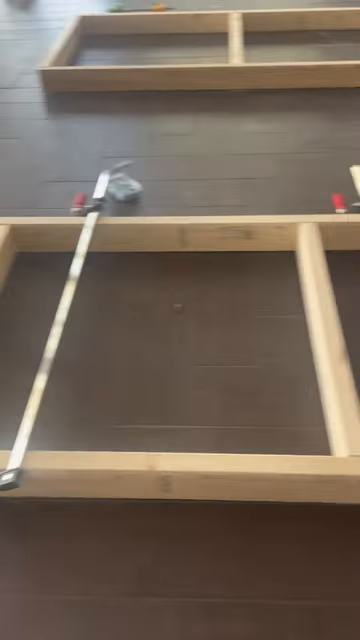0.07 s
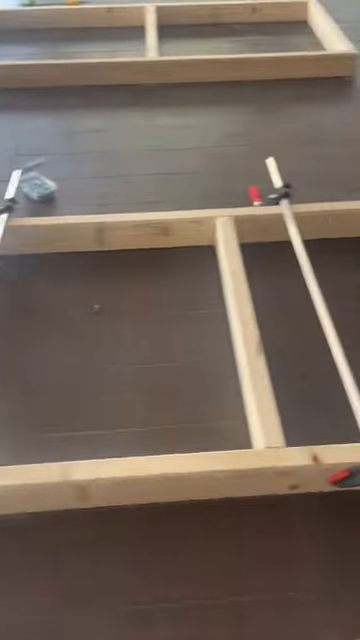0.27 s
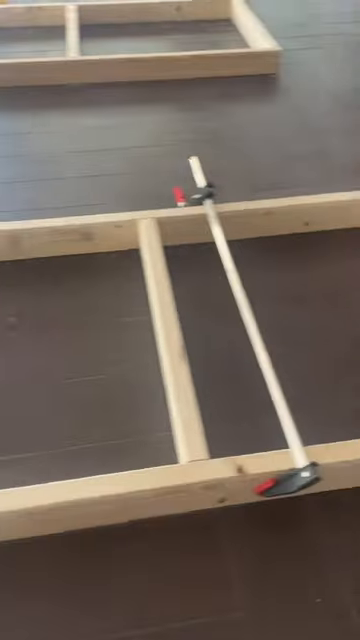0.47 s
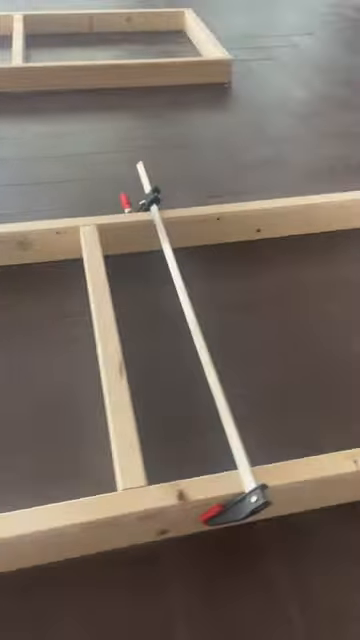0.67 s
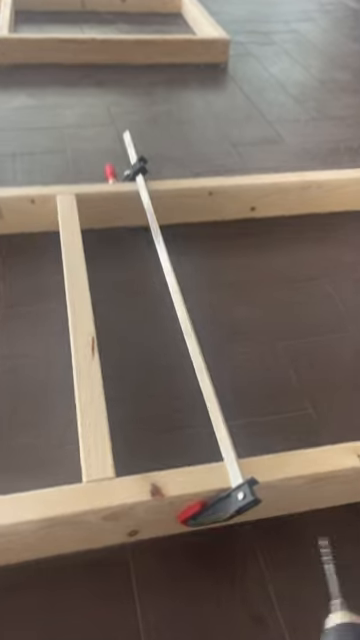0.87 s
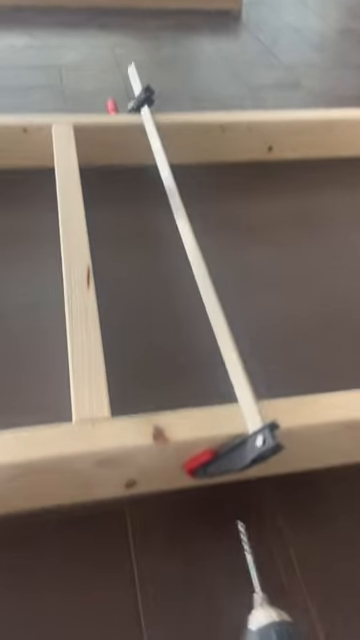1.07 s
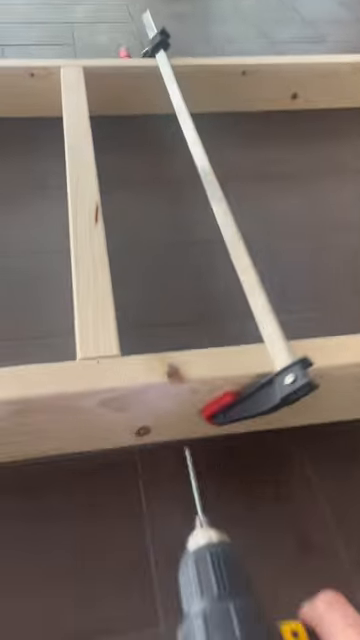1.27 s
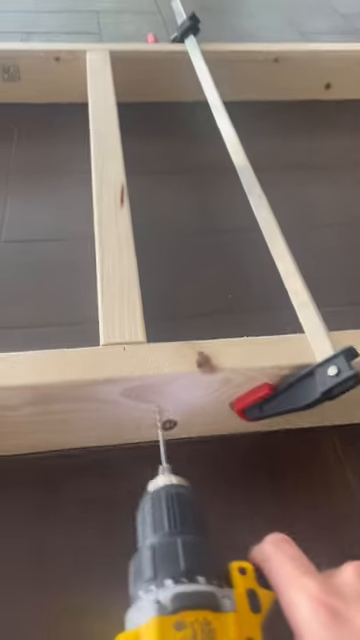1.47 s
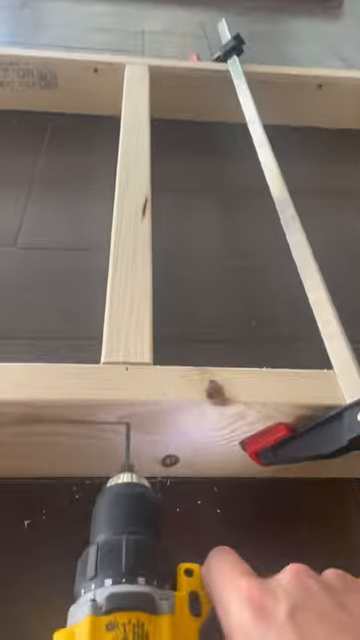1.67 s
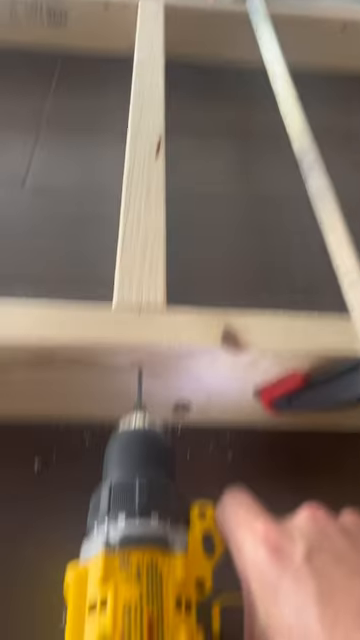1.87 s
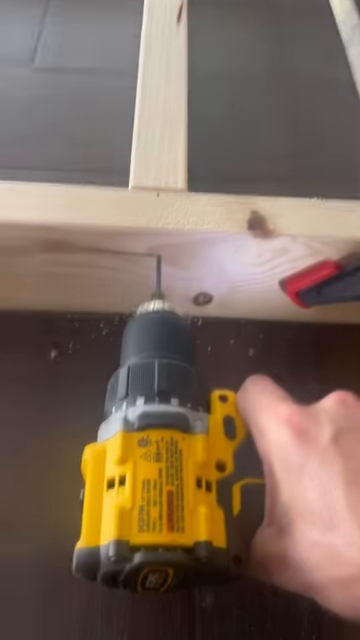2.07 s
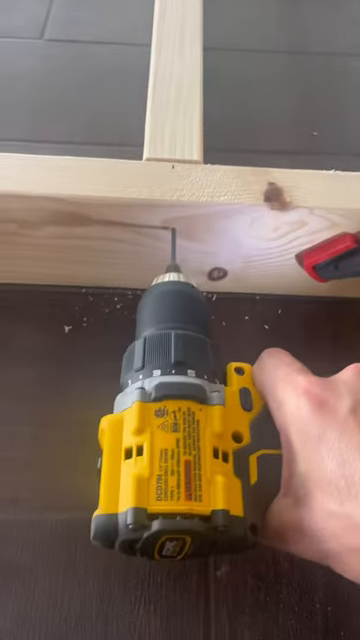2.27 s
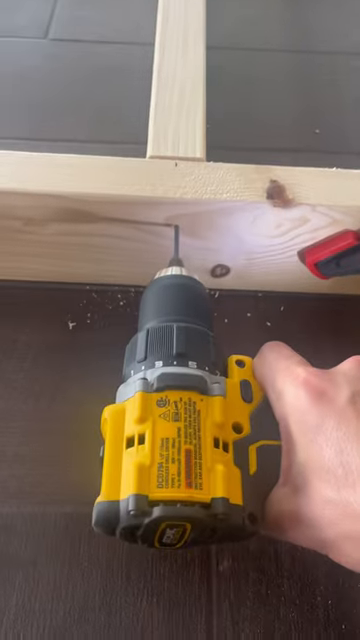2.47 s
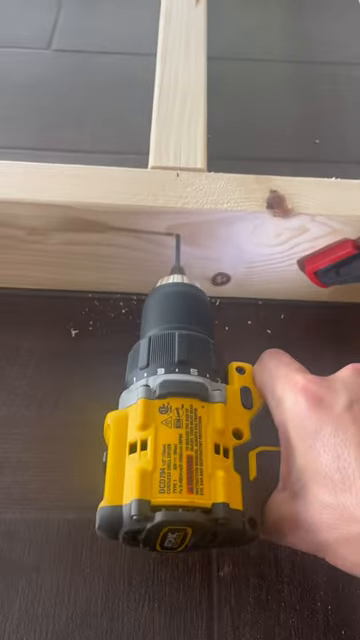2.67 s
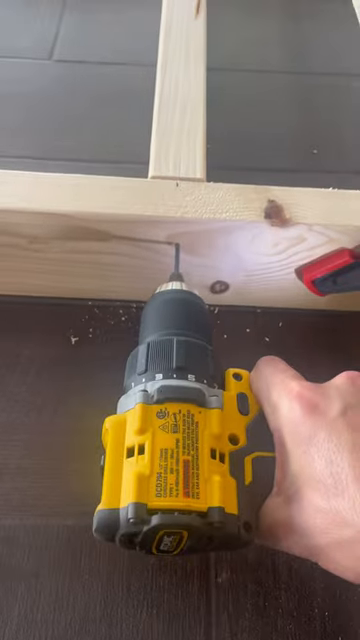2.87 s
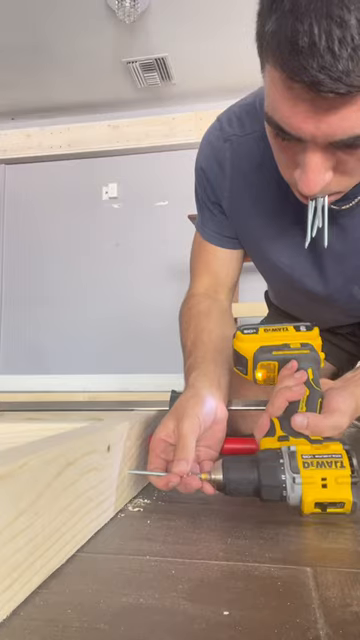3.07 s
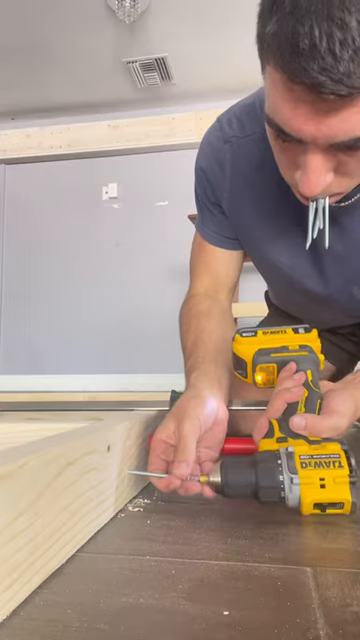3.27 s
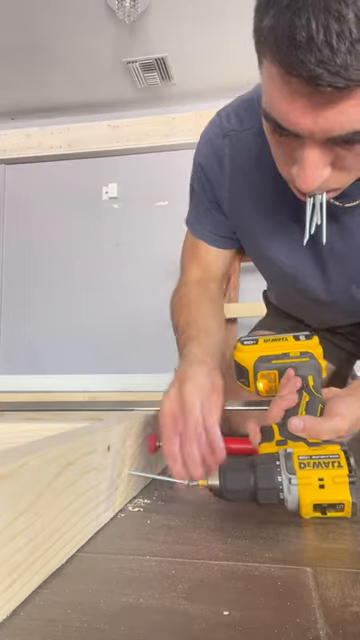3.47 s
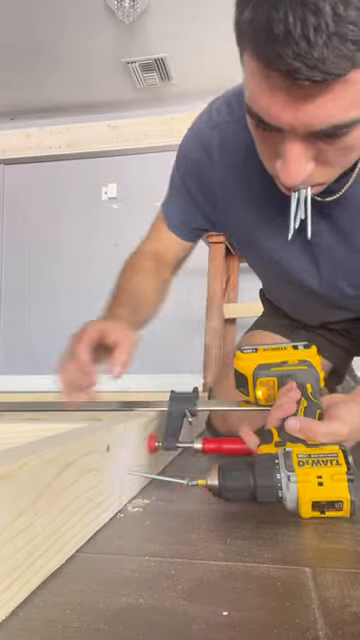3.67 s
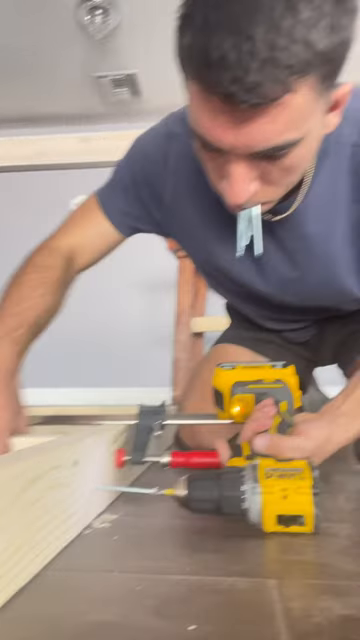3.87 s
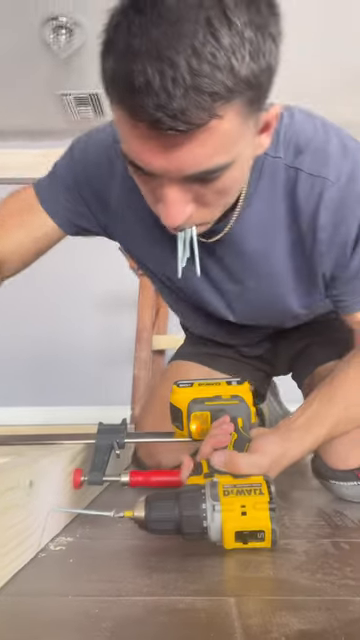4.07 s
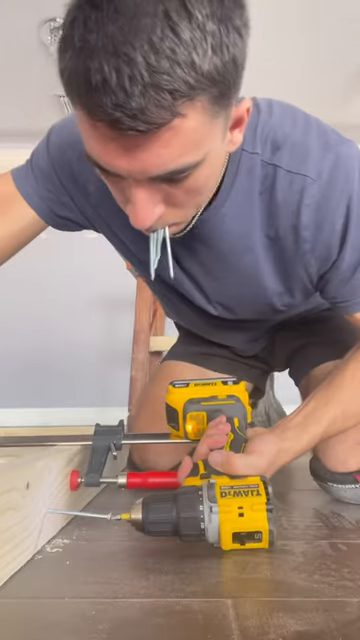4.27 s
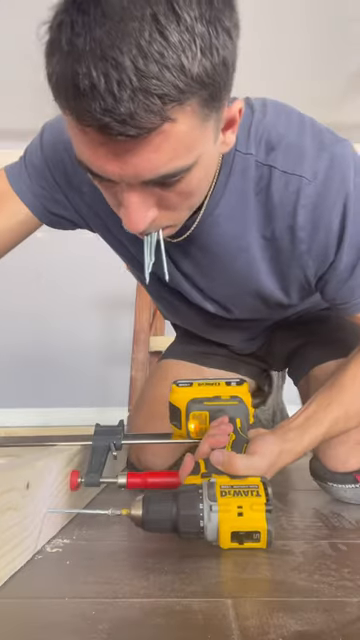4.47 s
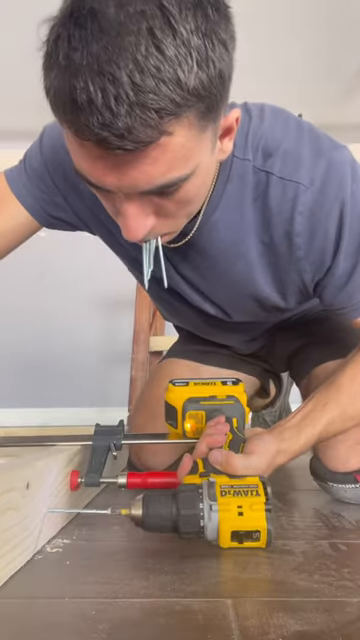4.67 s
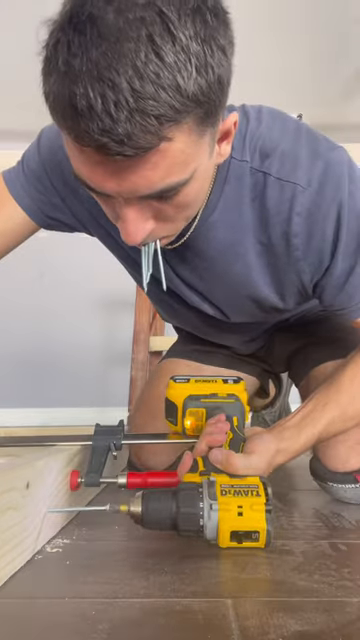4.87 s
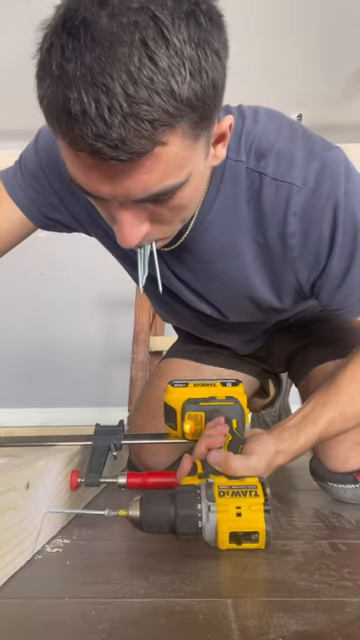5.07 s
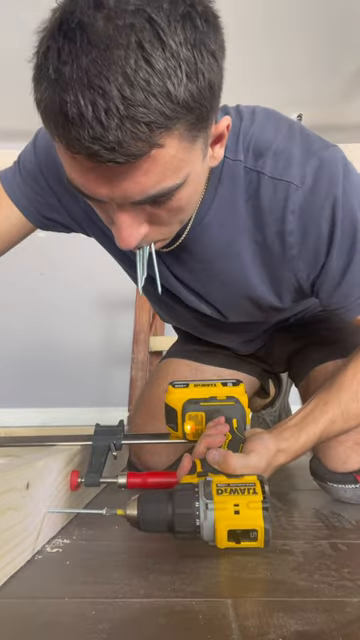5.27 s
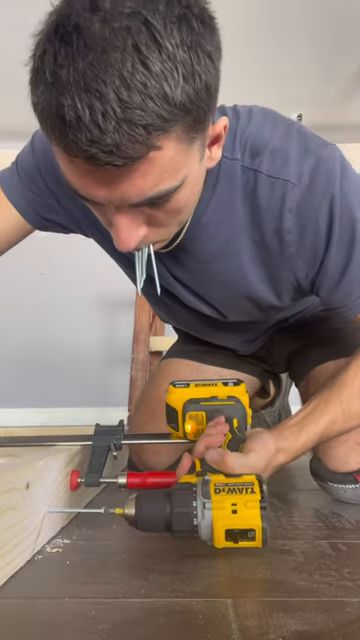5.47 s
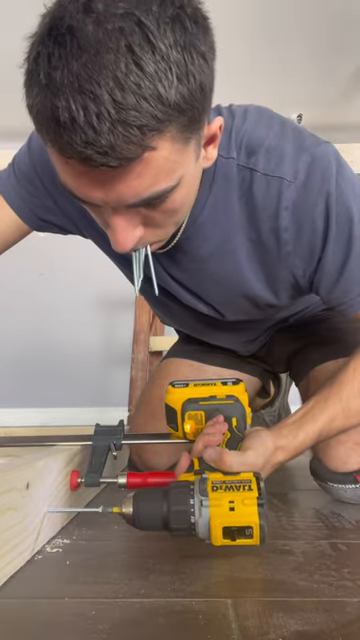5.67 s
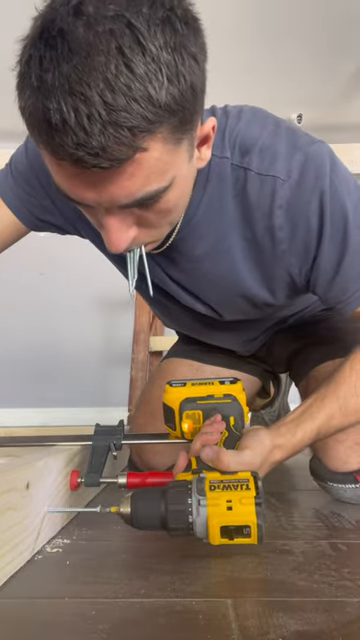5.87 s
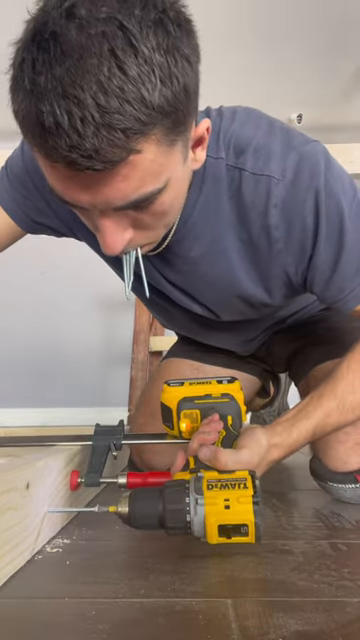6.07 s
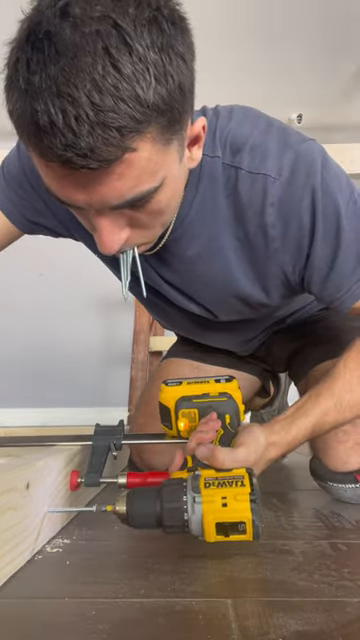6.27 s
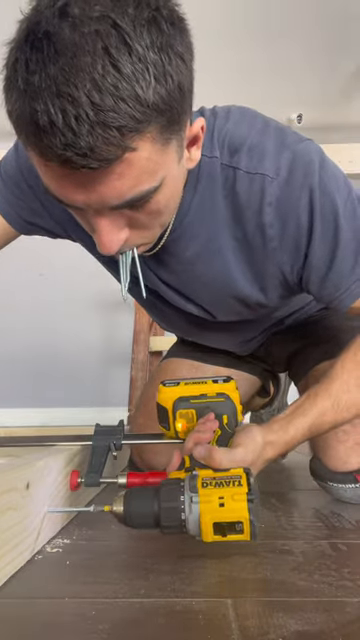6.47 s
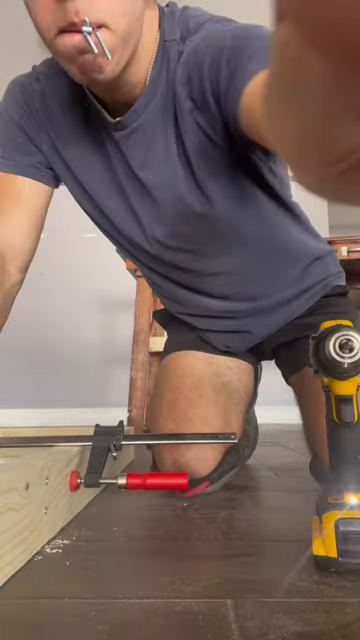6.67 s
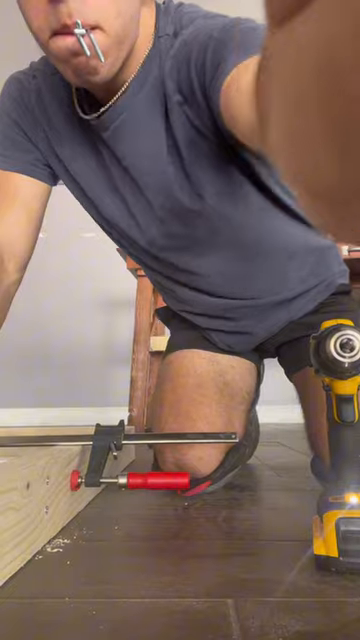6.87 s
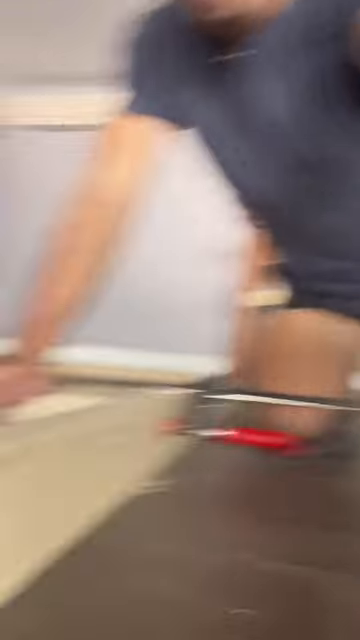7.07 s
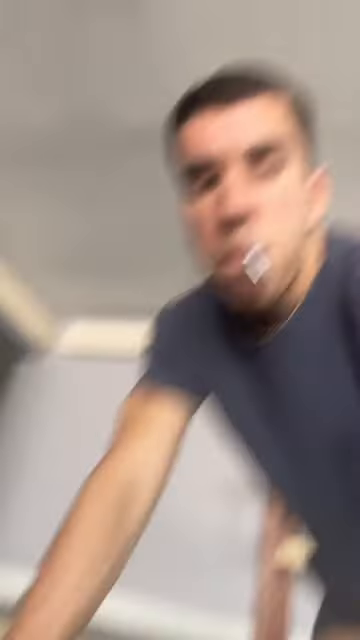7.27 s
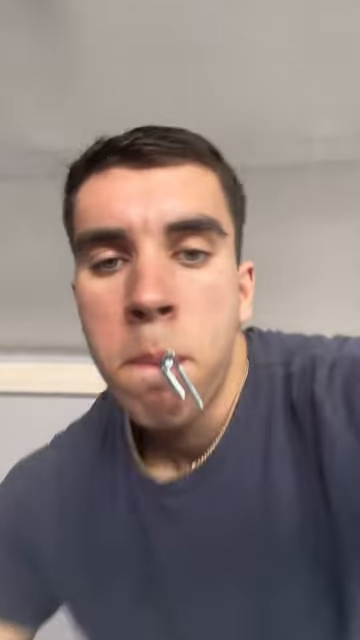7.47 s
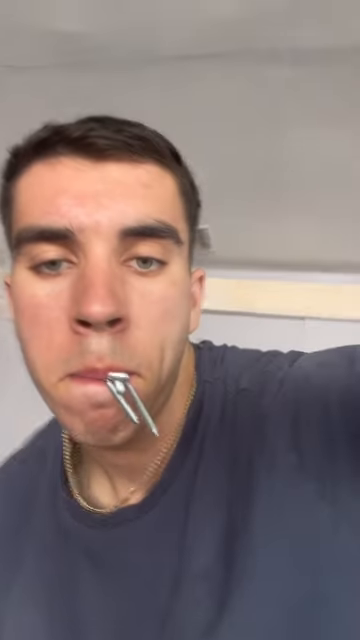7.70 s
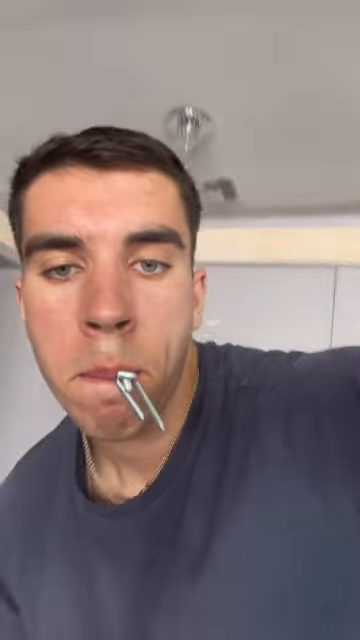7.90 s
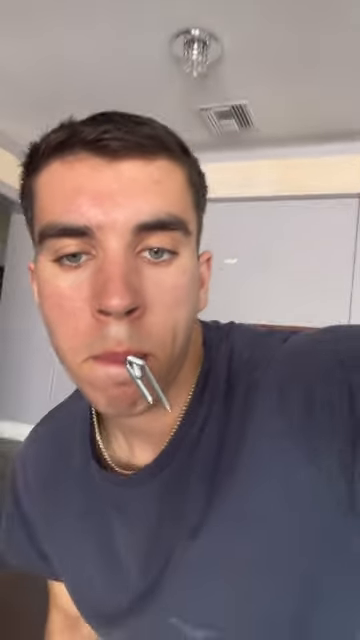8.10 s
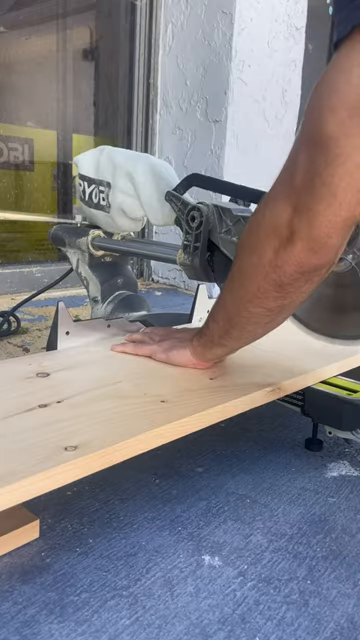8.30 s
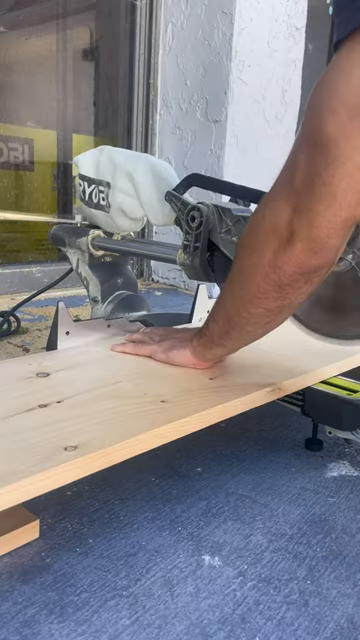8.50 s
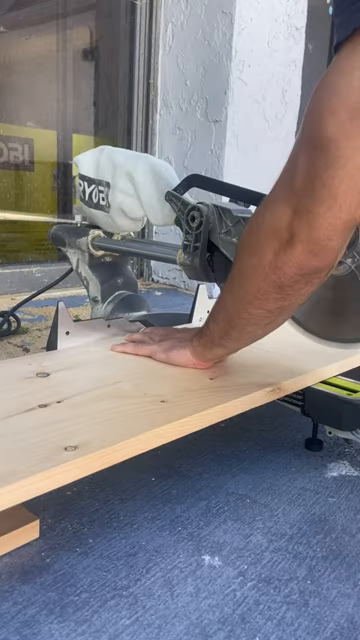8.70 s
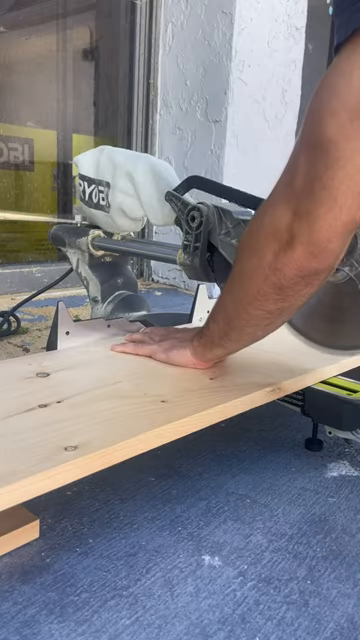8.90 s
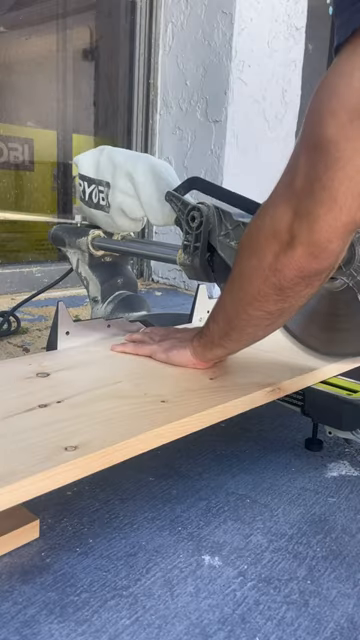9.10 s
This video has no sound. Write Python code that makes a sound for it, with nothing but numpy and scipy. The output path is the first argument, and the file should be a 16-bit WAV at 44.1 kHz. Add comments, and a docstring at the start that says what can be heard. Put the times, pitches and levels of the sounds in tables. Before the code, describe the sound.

Close handheld phone sound, stereo shifting with each cut. Soft room noise first, then abrupt rushing drill noise with a thin high whistle. Next a short grind, knocks, gritty scrapes and low hand thumps, followed by a slow screw drive growing louder, grinding and droning through hollow boards. It stops with knocks and handling rumble, a bright metallic rattle echoes off bare walls, then a circular saw's roar starts abruptly.

```python
"""A cordless drill in a bare room: first at full speed (air noise, shaft and gear tones, fan whistle), then slowly
driving a screw (grinding noise, a booming timber frame, motor whines) amid knocks, scrapes and clattering screws.
A quiet look at the frame comes before, and a circular saw still gaining speed comes after; all four are cut hard.
Hands thump and rumble on the phone, and the stereo picture differs with each way the phone faces."""
import sys
import numpy as np
from scipy import signal
from scipy.fft import rfft, irfft, next_fast_len
from scipy.io import wavfile
from scipy.ndimage import uniform_filter1d

SR = 44100
rng = np.random.default_rng(int(sys.argv[2]) if len(sys.argv) > 2 else 0)


def store_wav(level_fs):
    """Save 16-bit WAV to argv[1]."""
    pcm = np.round(np.clip(np.atleast_2d(level_fs), -1, 1) * 32767)
    wavfile.write(sys.argv[1], SR, pcm.T.astype(np.int16))


N = 403074

DRILL_CUT_S, SCREW_CUT_S, SAW_CUT_S = 1.5962, 2.93, 8.2865

# Board resonances of the frame: pitch_hz, pole_width_hz (before any narrowing), level_db (relative)
BOARD_MODES = [(445.8, 32, -3.5), (602.6, 33, -3), (778.6, 45, 1), (899.6, 28, -2.5), (1018, 24, -6),
               (1162, 28, -6)]


def gain_of(db):
    """Converts decibels to amplitude gain."""
    return 10 ** (np.asarray(db) / 20)


def evened(x):
    """Scales a sound to rms 1."""
    return x / np.sqrt(np.mean(x ** 2) + 1e-20)


def read(points, hz, axis=1):
    """Reads one column of a table over log frequency."""
    rows = np.array(points)
    return np.interp(np.log(hz + 1), np.log(rows[:, 0] + 1), rows[:, axis])


def played(rows):
    """Gives the start time of a curve table and its columns, sample by sample."""
    s, *columns = np.transpose(rows)
    t = np.arange(s[0], s[-1], 1 / SR)
    return s[0], *(np.interp(t, s, column) for column in columns)


def add(mix, start_s, sound):
    """Mixes a sound in at its start time."""
    part = mix[round(start_s * SR):][:len(sound)]
    part += sound[:len(part)]


def drift(size, hz):
    """Slow random movement of rms 1: noise through two equal low-pass poles."""
    noise = rng.standard_normal(size + SR)
    poles = [1, -2 * np.exp(-2 * np.pi * hz / SR), np.exp(-4 * np.pi * hz / SR)]
    return evened(signal.lfilter([1], poles, noise)[SR:])  # the first second lets the filter settle


def hiss(air, bright, patchy_db):
    """Noise of a given spectrum, tilted above 1 kHz by bright (dB per octave), with drifting patches."""
    frames, hz = len(bright) // 256 + 5, np.fft.rfftfreq(1024, 1 / SR)
    real, imaginary, patches = rng.standard_normal((frames, 513, 3)).T
    patches = uniform_filter1d(patches, 10, axis=0)
    patches = evened(uniform_filter1d(patches, 10, axis=1))
    octaves = np.log2(np.maximum(hz, 1000) / 1000)[:, None]
    tilt = octaves * np.interp(np.arange(frames) * 256, np.arange(len(bright)), bright)
    shape = gain_of(read(air, hz))[:, None]
    level = shape * gain_of(tilt + patchy_db * patches) / np.sqrt(np.mean(shape ** 2))
    z = (real + 1j * imaginary) * level
    return 55 * signal.istft(z / 1024, nperseg=1024, noverlap=768)[1][:len(bright)]


def resonate(x, modes):
    """Sum of steep resonances: shift each down to zero, smooth twice, shift back."""
    out = np.zeros(len(x))
    for hz, width, db in modes:
        turn = np.exp(2j * np.pi * np.cumsum(hz * np.ones(len(x))) / SR)
        r = np.exp(-np.pi * width / SR)
        smooth = signal.lfilter([1], [1, -2 * r, r * r], x / turn)
        out += gain_of(db) * evened((turn * smooth).real)
    return out


def tone(hz, db, waver_db, rate_hz):
    """A sine whose level wavers at random."""
    level = np.sqrt(2) * gain_of(db + waver_db * drift(len(hz), rate_hz))
    return level * np.sin(2 * np.pi * (np.cumsum(hz) / SR + rng.random()))


def dying(t60, seconds):
    """Time axis and exponential decay after a rise of about 1 ms."""
    t = np.arange(round(seconds * SR)) / SR
    return t, gain_of(-60 * t / max(t60, .005)) * np.minimum(t / 0.00093, 1)


def swells(rows, rise_db):
    """Level of overlapping gestures, each rising fast (dB a second) to its peak and dying away."""
    t = np.arange(N) / SR
    return np.sqrt(sum(gain_of(db + np.minimum(rise_db * (t - s), -60 * (t - s) / t60)) ** 2
                       for s, db, t60 in rows))


def drill():
    """Full-speed drill: cooling air and cutting rasp; then shaft orders, gear mesh and fan-blade whistle."""
    # Levels over time, the first row set at the cut: time_s, air_db, fan_whistle_db
    run = [(1.61, -26, -34), (1.81, -26, -23.5), (1.87, -25, -31), (2.1, -23.5, -19.5), (2.83, -28.5, -22),
           (2.925, -30.5, -25)]
    # Tones locked to the shaft: multiple_of_shaft, level_db
    shaft_orders = [(1, -39), (2, -55), (3, -53), (4, -44.5), (8, -41), (12, -44.5), (15, -54), (22, -44.5)]
    # Gear tones at nominal shaft speed: pitch_hz, level_db
    gear_tones = [(56, -57), (110, -57), (166, -58.5), (221, -58), (611, -54.5), (1101, -43), (2202, -51.5),
                  (4295, -52.5), (5396, -45), (5702, -49.5)]
    # Air spectrum: pitch_hz, relative_level_db (per Hz)
    air = [(150, -13.5), (300, -15.5), (600, -5), (1600, -2.5), (2200, 1), (2900, -5.5), (3600, 0.5),
           (4600, -0.5), (6000, 0), (7600, -1), (9200, 2.5), (11000, -11.5), (13000, -16.5), (15500, -18.5)]
    # The bit cutting: pitch_hz, pole_width_hz, level_db (relative to the air curve)
    bit_rasp = [(1940, 480, -11.5), (2890, 720, -11.5), (5320, 350, -13.5)]
    shaft_hz, fan_blades = 415.95, 23
    bite_peak_s, bite_width_s = 0.74, 0.48
    start_bright, dulls_per_s = 1.1, 1.3  # dB per octave, and its loss a second: the noise grows duller

    _, db, fan_db = played(run)
    size = len(db)
    t = np.arange(size) / SR
    shaft = shaft_hz * (1 + 0.00031 * drift(size, 3.))
    hum = sum(tone(k * shaft, level, 1.4, 11.0) for k, level in shaft_orders)
    for hz, level in gear_tones:
        pitch = hz * shaft / shaft_hz * (1 + 0.0011 * drift(size, 25.))
        hum += tone(pitch, level, 1.6, 15.0)
    whistle = tone(fan_blades * shaft, fan_db, 1.0, 30.)
    bite = np.exp(-((t - bite_peak_s) / bite_width_s) ** 2)
    rasp = bite * resonate(rng.standard_normal(size), bit_rasp)
    noise = hiss(air, start_bright - dulls_per_s * t, patchy_db=1.5)
    return gain_of(db) * (noise + rasp), hum + whistle


def screwing():
    """Thread judder and once-a-turn motor kicks make the grinding, and shake boards, shell and frame."""
    # One table a trigger squeeze: time_s, grinding_db, frame_boom_db, boom_hz, motor_turns_per_s
    squeezes = [
        [(2.935, -45.5, -48, 185, 100), (3.011, -41, -40, 181, 107), (3.379, -37.5, -39.5, 192, 95),
         (3.4, -54, -42, 179, 90), (3.442, -60, -34.5, 176.6, 87), (3.56, -74, -54.5, 180, 65)],
        [(4.34, -43, -33.5, 220.4, 102), (4.74, -38, -34, 235.4, 110), (4.88, -37.5, -36, 232.4, 114),
         (5.03, -34, -37, 238, 116), (5.39, -31, -31.5, 225.1, 138), (5.55, -29.5, -32, 221.5, 134),
         (5.66, -28.5, -24.5, 234.2, 134.5), (5.93, -28.5, -24.5, 232, 134.5), (6.04, -28.5, -26, 228.9, 124.5),
         (6.37, -26, -23.5, 256.6, 125), (6.53, -25, -24, 252.6, 123), (6.54, -32, -35, 252, 123)],
    ]
    # Grinding air: pitch_hz, relative_level_db (per Hz)
    air = [(160, -35), (250, 1), (340, -12.5), (500, -5.5), (1000, -8), (1600, -9), (2400, -14),
           (3400, -15), (4600, -17.5), (6000, -21.5), (7600, -22.5), (9200, -29), (11000, -41.5),
           (13000, -52), (15500, -58)]
    # Gearbox resonances: pitch_hz, pole_width_hz, level_db (relative)
    gearbox = [(2176, 190, -8), (3430, 150, -17.5), (4350, 160, -17.5), (6580, 420, -19),
               (8130, 300, -16.5)]
    # The drill's shell: pitch_hz, pole_width_hz, level_db (relative)
    housing = [(623, 290, -4.5), (1184, 650, -6), (2190, 820, -12.5)]
    buzz, throb_depth = 0.41, 0.11  # share of kicks in the judder; depth of the throb in the grinding
    boom_width_hz = 45.6
    # Above this boom level the slips lock and their pitch wanders less (shares of pitch)
    lock_db, loose_wander, locked_wander = -29, 0.04995, 0.0071
    kick_filter = signal.butter(4, 400., "high", fs=SR, output="sos")

    for rows in squeezes:
        s, db, boom_db, boom_hz, turns_hz = played(rows)
        size = len(db)
        turns = np.cumsum(turns_hz * (1 + .006 * drift(size, 6.))) / SR
        kicks = evened(signal.sosfilt(kick_filter, np.diff(np.floor(turns), prepend=0)))
        judder = (1 - buzz) * rng.standard_normal(size) + buzz * kicks
        judder = judder * gain_of(2.0 * drift(size, 40.))

        bright = 0.27 + 0.068 * (db + 30.5)  # harder work is brighter
        throb = 1 + throb_depth * np.cos(2 * np.pi * turns)
        grind = gain_of(-2.5) * throb * hiss(air, bright, patchy_db=1.5)
        grind += gain_of(-7.5) * resonate(judder, gearbox)

        boards = np.zeros(size)
        for hz, width, level in BOARD_MODES:
            pitch = hz * (1 + 0.0082 * drift(size, 2.56))
            come_and_go = gain_of(2.25 * drift(size, 3.3))
            boards += come_and_go * resonate(judder, [(pitch, 0.58 * width, level)])
        growl = resonate(kicks * gain_of(2.4 * drift(size, 25.)), housing)  # motor orders glide with its speed

        locked = 1 / (1 + np.exp((lock_db - boom_db) / 1.325))
        boom_hz = boom_hz * (1 + loose_wander * (1 - locked) * drift(size, 3.515))
        slips_hz = boom_hz * (1 + locked_wander * drift(size, 16.5))
        boom = resonate(judder, [(boom_hz, boom_width_hz, -2.5 - 4.7 * locked)])
        boom += tone(slips_hz, -11 + 9.4 * locked, 1.6, 10.0)

        body = gain_of(-4) * boards + gain_of(-7) * growl
        body_db = db + 0.23 * (boom_db + 30.0)
        yield s, gain_of(db) * grind, gain_of(body_db) * body + gain_of(boom_db) * boom


def whines():
    """Motor tones under load sag, then glide off, in a fuzz of noise that widens with unsteadiness."""
    # start_s, hold_s, glide_s, pitch_hz (before the sag), end_pitch_hz, tone_level_db, unsteadiness (share of pitch)
    notes = [(2.95, .19, 0.2, 1385, 1250, -46.5, 0.022), (3.0, .25, .13, 2600, 2450, -53, 0.025),
             (4.36, .2, 0.278, 2500, 2610, -52.5, 0.0087), (4.4, .5, .15, 4330, 4300, -58.5, .012),
             (5.3, .2, .09, 3900, 3780, -47, 0.0196), (4.98, .26, 0.095, 1492, 1770, -36.5, 0.0073),
             (4.9, 0.623, 0.082, 2482, 2300, -45.5, 0.0057), (5.57, .38, 0.27, 2468, 2415, -37, 0.0028),
             (5.56, 0.655, 0.085, 2335, 2540, -36, 0.004), (6.28, 0.2, 0.065, 1500, 1470, -36.5, 0.0069)]
    sag_per_s = .02  # share of pitch
    glide_bend = 4.48  # the glide starts fast and levels out
    for s, hold_s, glide_s, hz, end_hz, db, unsteady in notes:
        t = np.arange(0, hold_s + glide_s, 1 / SR)
        gone = 1 - np.clip(1 - (t - hold_s) / glide_s, 0, 1) ** glide_bend
        pitch = (1 - gone) * hz * (1 - sag_per_s * t) + gone * end_hz
        fuzz = resonate(rng.standard_normal(len(t)), [(pitch, 4.3 * unsteady * hz, db - 5.0)])
        whine = tone(pitch * (1 + unsteady * drift(len(t), 29.6)), db, 1.9, 21.0)
        yield s, (fuzz + whine) * signal.windows.tukey(len(t), .1)


def saw():
    """Air roaring in the saw's guard; then the fan's rising whistle and the hum of shaft and gears."""
    # Levels over time, the first row set at the cut: time_s, roar_db, fan_whistle_db
    run = [(8.295, -22.5, -25), (8.51, -23, -22.5), (8.7, -25, -27.5), (8.88, -25, -26.5),
           (8.93, -24.5, -32), (9.135, -24, -30)]
    # Shaft and gear hum: multiple_of_shaft, level_db
    orders = [(1, -41), (2.55, -36.5)]
    # Guard resonances: pitch_hz, pole_width_hz, level_db (relative)
    guard = [(890, 110, -0.5), (1248, 39, -8.5), (1916, 410, 0), (2860, 360, 0), (3730, 89, -5.5),
             (5035, 300, -2)]
    # Air spectrum: pitch_hz, relative_level_db (per Hz)
    air = [(60, -21), (150, -11), (300, -5.5), (600, 2.5), (1000, -2.5), (1600, 0.5), (2400, -2),
           (3400, -2), (4600, 0), (6000, -3.5), (7600, -10.5), (9200, -10.5), (11000, -12), (13000, -20),
           (15500, -23.5)]
    fan_blades, bright = 12, 0.13  # bright in dB per octave
    start_hz, full_hz, spin_up_s = 4060, 4580, .52  # the whistle closes in on full speed

    _, db, fan_db = played(run)
    t = np.arange(len(db)) / SR
    hz = full_hz + (start_hz - full_hz) * np.exp(-t / spin_up_s)
    roar = gain_of(1.5) * hiss(air, bright + 0 * db, patchy_db=1.5)
    roar += gain_of(-9) * resonate(rng.standard_normal(len(db)), guard)
    hum = sum(tone(k * hz / fan_blades, level, 1.8, 9.9) for k, level in orders)
    return gain_of(db) * roar, hum + tone(hz, fan_db, 1.0, 37.0)


def knocks():
    """Knocks on wood: a noisy crack, brighter and longer when strong, and ringing boards that build up and die."""
    # start_s, level_db, crack_db (relative to level_db), ring_t60_s
    blows = [(0.355, -54, -10.5, 0.025), (0.534, -50, -16, 0.027), (1.539, -42.5, -24, 0.046),
             (3.536, -40, -0.5, 0.025), (3.624, -38, -9, 0.063), (3.675, -17.5, -14, 0.049),
             (3.753, -23.5, -19.5, 0.069), (4.341, -32, -5, 0.047), (4.429, -15, -30, 0.097),
             (4.535, -17, -25, 0.11), (6.335, -16.5, -27, .12), (6.465, -17, -27, .12),
             (6.813, -14.5, -24, 0.031), (6.916, -20, -28, 0.029), (6.956, -40, -8.5, 0.045),
             (7.008, -40.5, -9.5, .05), (7.061, -35.5, -24, .05), (7.093, -27, -20, .06),
             (7.181, -31, -23, 0.057), (7.277, -39.5, -24, 0.054)]
    # Ringing modes: pitch_hz, level_db (relative, before the random spread)
    ring_modes = [(615, -13), (715, -7), (808, -1), (955, -17)]
    spread_db = 3  # each blow stirs the modes a little differently
    soften = signal.butter(4, 7000., fs=SR, output="sos")
    for s, db, crack_db, t60 in blows:
        t, fall = dying(t60, 0.18)
        rattle_s = 0.0017 + 0.035 * gain_of(db + crack_db + 19.0)
        crack_modes = [(1940, 1570, 4.0), (4600, 1700, .5 * (db + crack_db) + 14.)]
        crack = resonate(rng.standard_normal(len(t)), crack_modes) * np.exp(-t / rattle_s)
        crack = signal.sosfilt(soften, crack)
        ring = sum(gain_of(level + spread_db * rng.standard_normal()) * np.sin(2 * np.pi * hz * t)
                   for hz, level in ring_modes)
        build_up = np.minimum(t / (3.1 * t60 ** 3), 1)  # longer rings build up more slowly
        yield s, gain_of(db) * (fall * build_up * ring + gain_of(crack_db) * crack)


def scrapes():
    """The frame scrapes on the floor: gritty friction rings the boards, holds, then dies."""
    # start_s, level_db, hold_s, t60_s, loudest_board_hz
    drags = [(3.664, -25, 0.037, 0.2, 870), (3.708, -34, 0.058, 0.43, 762), (3.79, -35, 0.035, 0.38, 815),
             (3.885, -38, 0.026, 0.22, 790), (3.947, -44, 0.047, 0.4, 797), (6.701, -42, 0.05, 0.3, 920),
             (6.839, -45.5, .06, 1, 854), (7.096, -36.5, 0.043, 0.24, 893), (7.276, -45.5, 0.02, 0.26, 800)]
    rise_s = 0.015
    for s, db, hold_s, t60, hz in drags:
        t = np.arange(0, hold_s + t60, 1 / SR)
        grit = rng.standard_normal(len(t)) * gain_of(2.1 * drift(len(t), 45.))
        level = np.minimum(t / rise_s, 1) * gain_of(db - 60 * np.maximum(t - hold_s, 0) / t60)
        yield s, level * evened(resonate(grit, BOARD_MODES + [(hz, 230, 6.)]))


def clatter():
    """Screws clatter: noise bursts ring the metal, and the bare walls throw the noise back."""
    # start_s, level_db (before the rise and decay)
    bursts = [(7.5905, -19), (7.627, -22.5), (7.6393, -26.5), (7.6545, -33)]
    # Screw resonances: pitch_hz, pole_width_hz, level_db (relative)
    screw_modes = [(2100, 600, -5), (3830, 270, -2), (4350, 600, 1.5), (6020, 500, -1)]
    # Noise spectrum: pitch_hz, relative_level_db (per Hz)
    air = [(60, -71), (170, -48), (300, -11), (600, -4.5), (1600, -3), (3400, -2), (6000, 1), (9200, -12.5),
           (13000, -21), (15500, -58)]
    # Echo of the bare walls: pitch_hz, t60_s
    walls = [(300, 2.56), (1000, 1.1), (4000, 1.1), (8000, 0.69)]

    rattle, ring, first_s = np.zeros(SR), np.zeros(SR), bursts[0][0]
    t, fall = dying(0.054, 0.12)
    for s, db in bursts:
        swell = gain_of(db) * fall * np.minimum(t / 0.016, 1)
        add(rattle, s - first_s, swell * gain_of(-1) * hiss(air, 0 * t, patchy_db=1.0))
        add(ring, s - first_s, swell * resonate(rng.standard_normal(len(t)), screw_modes))
    # The echo is noise whose bands die at their own pace
    hz, t, z = signal.stft(rng.standard_normal(SR), SR, nperseg=256)
    tail = signal.istft(z * gain_of(-60 * t / read(walls, hz)[:, None]), SR, nperseg=256)[1]
    echo = signal.fftconvolve(rattle + 0.12 * ring, tail / np.linalg.norm(tail))[:SR]
    return first_s, rattle + ring + gain_of(0.5) * echo


def thumps():
    """Thumps through the phone's body: a few low cycles that sag in pitch, hold and stop."""
    # start_s, peak_db, settled_pitch_hz
    hits = [(1.149, -47.5, 61.9), (1.525, -47, 108), (3.02, -24, 165), (3.435, -34, 150), (3.627, -21, 159),
            (3.752, -22, 140), (3.779, -17, 117), (3.839, -17, 92), (3.925, -25, 112), (4.025, -29.5, 68),
            (6.813, -14, 100.5), (6.933, -15, 59.7), (7.146, -31.5, 191), (7.24, -28, 70), (7.294, -18, 67),
            (7.328, -19, 56.6), (7.449, -29, 68)]
    hold_s, t60 = 0.024, 0.1
    t = np.arange(0, .3, 1 / SR)
    fall = gain_of(-60 * np.maximum(t - hold_s, 0) / t60) * np.minimum(t / 0.0054, 1)
    sagging_t = t + 0.0044 * (1 - np.exp(-t / 0.011))
    for s, db, hz in hits:
        yield s, gain_of(db) * fall * np.sin(2 * np.pi * hz * sagging_t)


def handling():
    """Lumpy low noise: the rumble of hands gripping the phone."""
    # peak_time_s, rumble_db, t60_s
    grips = [(3.04, -36.5, 1.4), (3.65, -24, 0.8), (3.78, -18, .45), (3.87, -24, 0.52), (4.03, -40, .5),
             (6.82, -29, 0.5), (6.95, -35, 0.7), (7.06, -35, 1.2), (7.3, -24, .5), (7.42, -34.5, 0.54),
             (7.55, -37.5, 0.3)]
    # Rumble spectrum: pitch_hz, relative_level_db (per Hz)
    spectrum = [(20, -12.5), (50, -0.5), (90, 1.5), (160, -2.5), (280, -11.5), (450, -19), (900, -38),
                (2000, -51), (5000, -66), (9000, -95)]
    lumps = gain_of(1.1 * drift(N, 23.0))
    rumble = evened(hiss(spectrum, np.zeros(N), patchy_db=3.0) * lumps)
    return 0, swells(grips, 540) * rumble


def room_tones():
    """Soft noise of the room, at the frame and then facing the worker, with moving level and brightness."""
    # At the frame: time_s, level_db, brightness_db_per_octave
    frame_curve = [(0, -54, 0.9), (1.0, -56.5, -0.5), (1.3, -53.5, -4), (1.596, -54.5, -4.5)]
    # Its spectrum: pitch_hz, relative_level_db (per Hz)
    frame_air = [(60, 1.5), (150, -7.5), (300, -7), (600, -10), (1600, -13), (3400, -14), (6000, -16),
                 (9200, -21.5), (14000, -31)]
    # Facing the worker: time_s, level_db, brightness_db_per_octave
    worker_curve = [(2.93, -45.5, 6), (3.55, -50, 0), (4.1, -53.5, 3), (4.33, -51, 2.5), (6.75, -55, 2),
                    (7.38, -61, 0.5), (7.56, -48, 1.5), (7.74, -92, 8.5), (8.29, -110, 5.5)]
    # Its spectrum: pitch_hz, relative_level_db (per Hz)
    worker_air = [(60, 0), (150, -13), (300, -6.5), (600, -11.5), (1600, -17), (3400, -23), (6000, -28.5),
                  (9200, -48), (13000, -62.5)]
    for rows, air in ((frame_curve, frame_air), (worker_curve, worker_air)):
        s, db, bright = played(rows)
        yield s, gain_of(db) * hiss(air, bright, patchy_db=1.5)


def stereo(direct, diffuse, facing):
    """Right hears what left hears, shifted in phase; diffuse sound is also mixed with a scattered copy."""
    size = next_fast_len(N + SR)
    hz = np.fft.rfftfreq(size, 1 / SR)
    same = np.clip(read(facing, hz), 0, 1)
    lead, balance_db = read(facing, hz, axis=2), read(facing, hz, axis=3)
    z = signal.stft(diffuse, nperseg=512, noverlap=256)[2]
    z = z * np.exp(2j * np.pi * rng.random(z.shape[::-1]).T)  # same spectrum over time, unrelated phase
    scattered = evened(signal.istft(z, nperseg=512, noverlap=256)[1]) * np.std(diffuse)
    near, wide = rfft(direct, size), rfft(diffuse, size)
    left = near + wide
    right = (near + wide * same) * np.exp(-1j * lead) + np.sqrt(1 - same ** 2) * rfft(scattered, size)
    both = np.array([left * gain_of(balance_db / 2), right * gain_of(-balance_db / 2)])
    return irfft(both, size)[:, :N]


def stereo_by_facing(direct, diffuse):
    """Picks the stereo likeness, phase and balance for each facing, switching hard between them."""
    # Facing away: pitch_hz, likeness (0-1), left_lead_rad, left_minus_right_db
    away = [(150.3, 1, 1, 0), (400.5, 0.93, 0.72, 0.5), (999, 0.61, -0.3, 0), (1585, 1, -0.74, -1.5),
            (2504, 0.8, 1.08, 0.9), (3400, 0.6, 0.84, -0.5), (4700, 0.6, 0.52, -2), (5560, 0.97, 0.5, 0.5),
            (6430, .9, 1.48, 1), (7030, 1, 3, -0.5), (8330, 1, 3, 0), (9480, 0.7, 5, 0),
            (10300, 0.98, 6.5, 0), (12200, 1, 6.5, 0), (13300, .9, 9, 0), (15500, .8, 9, 0)]
    # Facing the worker: pitch_hz, likeness (0-1), left_lead_rad, left_minus_right_db
    selfie = [(60, 0.87, 1.1, 0.5), (240, 0.89, 0.86, 5), (580, 0.22, 2.5, -6.5), (938, 0.5, 4.56, -4.5),
              (1620, 0.89, 5.12, -2.5), (2510, 0.98, 4.29, -1.5), (4370, 0.38, 4.32, -3.5),
              (5400, 0.89, 3.15, -1.5), (7460, 0.71, 8.5, -4), (9400, 0.73, 7.8, 1), (10100, 1, 6.3, 0),
              (16500, 1, 6.3, 0)]
    # Lifted in the hand: pitch_hz, likeness (0-1), left_lead_rad, left_minus_right_db
    lifted = [(201, .8, -0.7, 1), (553, .6, -3, 5.5), (1000, .9, -2, 8.5), (2200, .5, -2, -2.5),
              (4000, .3, -2, -5)]
    lift_start_s, lift_end_s = 6.6, 7.56  # picked up and swung round

    t = np.arange(N) / SR
    at_worker = (t > SCREW_CUT_S) & (t < SAW_CUT_S)
    in_hand = (t > lift_start_s) & (t < lift_end_s)
    near = np.zeros((2, N))
    for now, facing in ((at_worker & ~in_hand, selfie), (in_hand, lifted)):
        near += stereo(direct * now, diffuse * now, facing)
    far = stereo(direct * ~at_worker, diffuse * ~at_worker, away)
    return np.where(at_worker, near, far)


def scene():
    """Lays the sources out as direct and diffuse sound, then spreads both into stereo."""
    direct, diffuse, t = np.zeros(N), np.zeros(N), np.arange(N) / SR
    for s, grind, ringing in screwing():
        add(diffuse, s, grind)
        add(direct, s, ringing)
    for s, sound in [*whines(), *knocks(), *thumps()]:
        add(direct, s, sound)
    for s, sound in [*scrapes(), clatter(), handling(), *room_tones()]:
        add(diffuse, s, sound)
    diffuse[t > SAW_CUT_S] = 0  # the diffuse sounds so far stop at the saw's cut
    for cut_s, (air, tones) in ((DRILL_CUT_S, drill()), (SAW_CUT_S, saw())):
        # A short mirrored end carries each tool on past its curve
        add(diffuse, cut_s, np.pad(air, (0, 900), "reflect"))
        add(direct, cut_s, np.pad(tones, (0, 900), "reflect"))
    return stereo_by_facing(direct, diffuse)


def record(dry):
    """The microphone's bass roll-off and the band limit."""
    bass_edge_hz, top_edge_hz = 32, 15620
    thin = signal.sosfilt(signal.butter(2, bass_edge_hz, "high", fs=SR, output="sos"), dry)
    low_pass = signal.firwin(511, top_edge_hz, window=("kaiser", 9), fs=SR)
    return signal.oaconvolve(thin, low_pass[None], "same")


dry = scene()
out = record(dry)
store_wav(out)
```